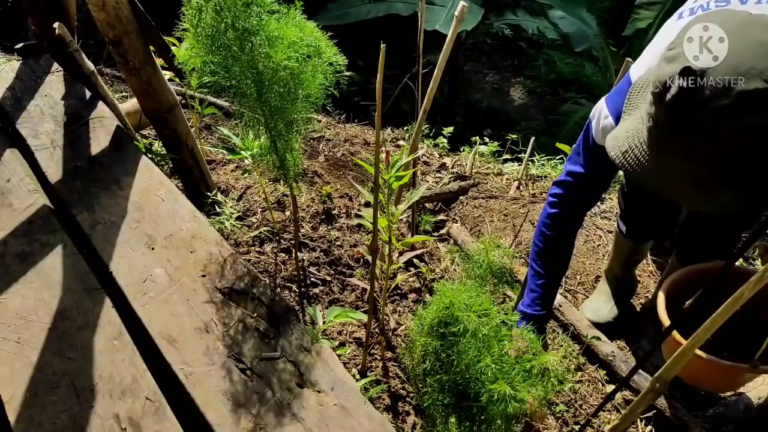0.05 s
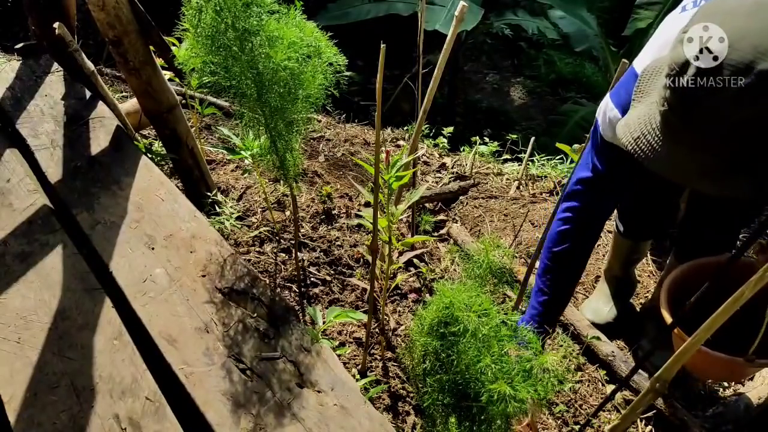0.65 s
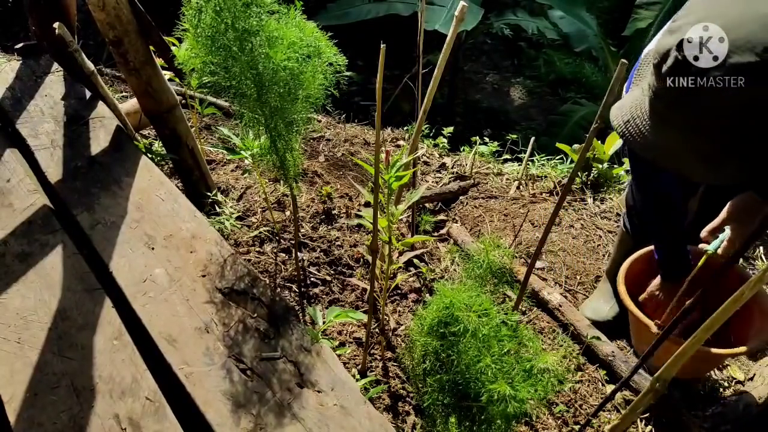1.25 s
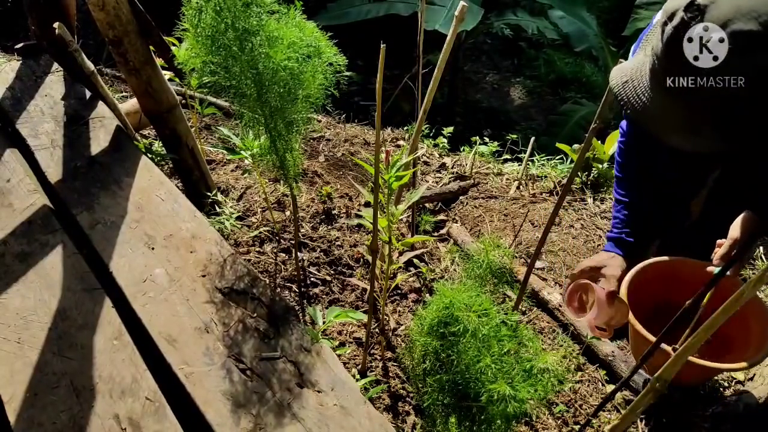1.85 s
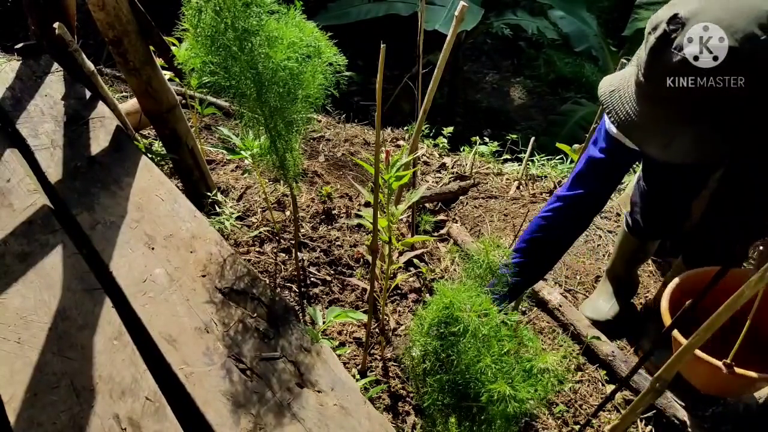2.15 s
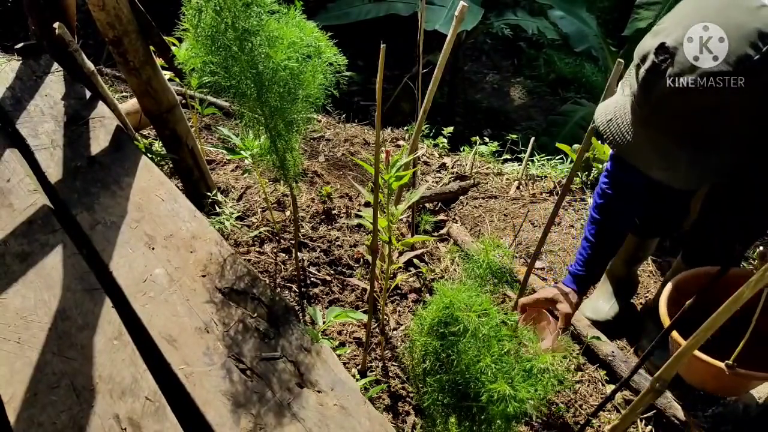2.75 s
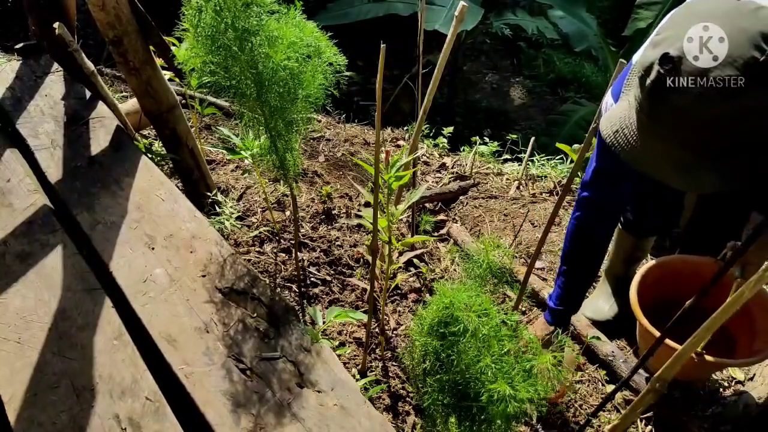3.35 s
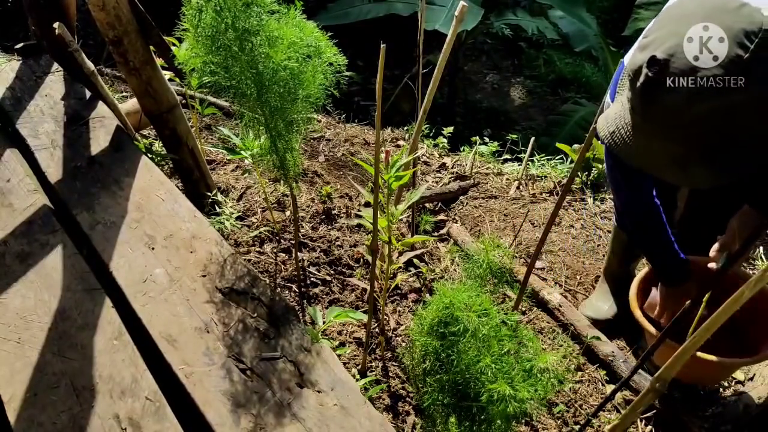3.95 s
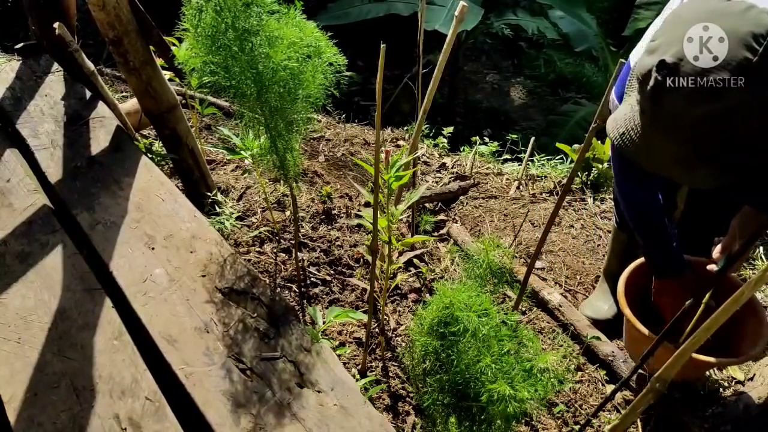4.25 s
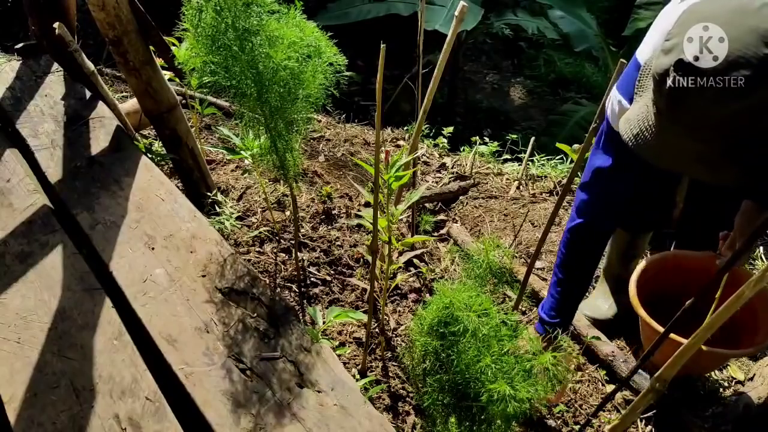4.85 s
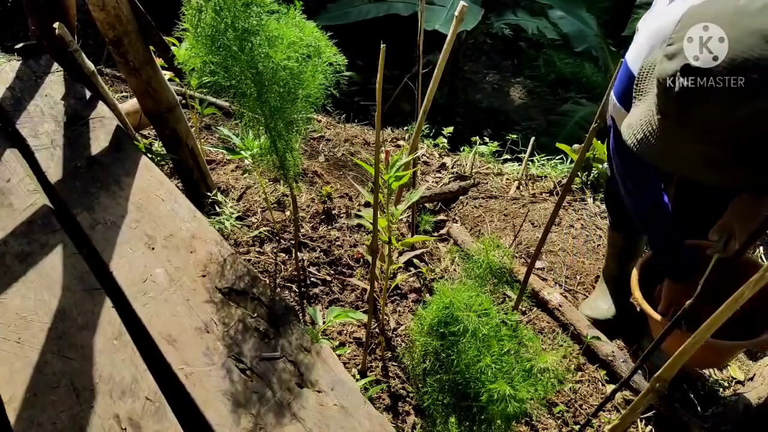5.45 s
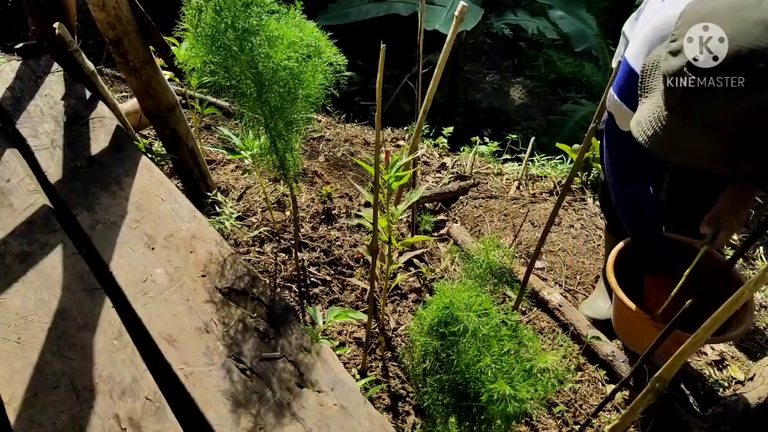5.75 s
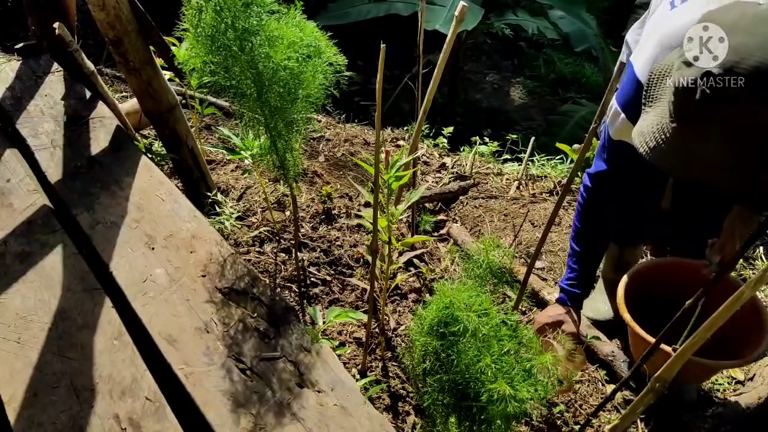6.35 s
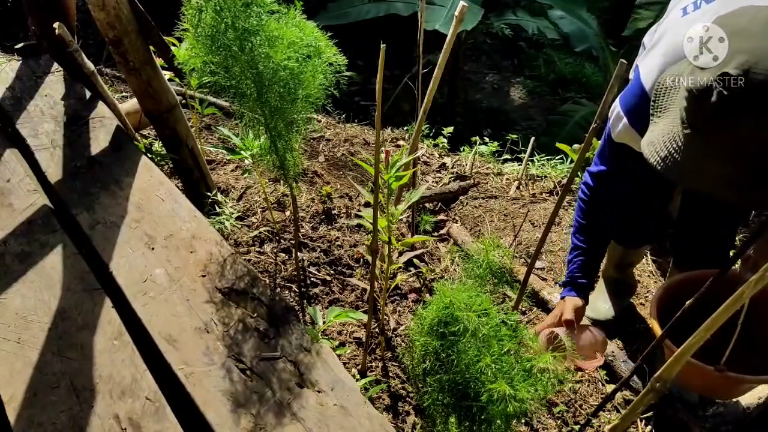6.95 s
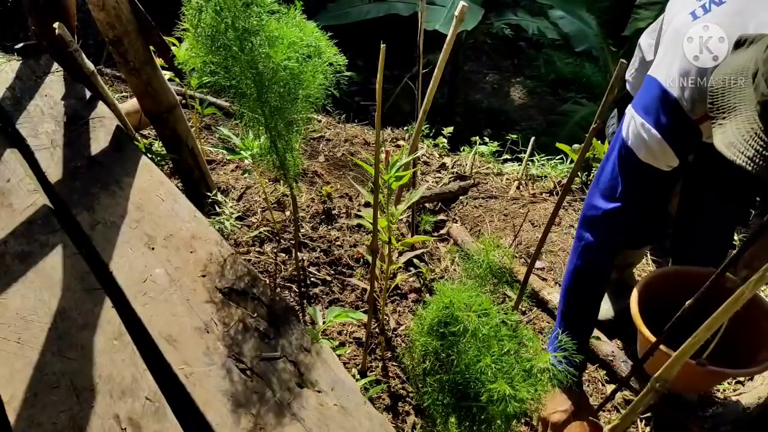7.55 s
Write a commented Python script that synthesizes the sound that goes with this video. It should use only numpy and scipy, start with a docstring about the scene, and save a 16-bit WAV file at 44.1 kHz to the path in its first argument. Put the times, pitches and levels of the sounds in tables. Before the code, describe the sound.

A high cicada drone fills a yard from the start, rises slightly in pitch near 3.7 seconds, then pulses and dies away by 5.5. A far rooster ends its crow within the first second, among thin, high bird chirps. At 1.3 seconds, a few steps from the stereo microphone, a cup slaps into water in a plastic bucket, with a hollow ring, splashing and gurgling plops until about 2. Water patters lightly on leaves and soil around 2.4. A second sharp dip comes at 4 seconds and a third at 5.6, followed by bubbles and drips until 6.1 and a soft low plop at 6.3. These splashes are the loudest sounds. A faint run of four falling bird whistles passes from 4.7 to 5.5, and more slurred chirps follow from 6.5 to 7.3. Underneath are a faint hiss, a steady rumble and soft thuds of the bucket and a footstep.

```python
"""Water from a plastic bucket, a few steps from a stereo microphone in a yard: a gardener waters seedlings.
Three times a cup dips in, slapping the water and ringing the bucket; trapped air gurgles and plops,
and water patters on leaves and soil. Cicadas drone near 5 kHz with their tymbals, rise a little in pitch
and die away. Songbirds whistle from the trees around and a far rooster ends its crow.
Underneath are a faint hiss, a steady rumble, and soft low thuds of the bucket and a footstep."""
import sys
import numpy as np
from scipy import signal
from scipy.fft import rfft, irfft, next_fast_len
from scipy.io import wavfile
from scipy.ndimage import uniform_filter1d

SR = 44100
rng = np.random.default_rng(int(sys.argv[2]) if len(sys.argv) > 2 else 0)


def master(y):
    """Save y as 16-bit WAV."""
    cut = np.clip(np.atleast_2d(y).T, -1, 1)
    pcm = np.round(cut * 32767)  # scale
    wavfile.write(sys.argv[1], SR, pcm.astype(np.int16))


N = 339129
T = np.arange(N) / SR

# Levels in the tables are those before any colouring and placement.
# background hiss of the yard, with a faint cicada band near 4.75 kHz: frequency_hz, level_db
YARD_HISS = [(15, -40.5), (25, -9), (95, 0.5), (191, -14), (655, -14), (1390, -19.5), (2630, -20.5),
             (4040, -27), (4750, -22), (5880, -25.5), (6540, -19), (7480, -25), (8550, -21.5),
             (10000, -30.5), (15000, -29.5)]
# soft low thuds of the bucket and a footstep: peak_s, level_db
LOW_THUDS = [(1.34, -62), (2.26, -62), (3.351, -71.5), (4.09, -63.5)]
# single insects at the start of the drone: pitch_hz, level_db
CICADA_TONES = [(4621, -5), (4660, -11), (4725, -7), (4745, -2), (4774, -3), (4825, -10), (4869, 0),
                (4915, -7), (4960, -13)]
# rasp of the tymbals around those tones: frequency_hz, level_db
TYMBAL_RASP = [(4300, -59.5), (4480, -24.5), (4620, 1), (4760, 0), (4900, 4), (5020, -18), (5200, -32),
               (5350, -36), (5520, -13.5), (5830, -13), (6100, -38.5), (6600, -59)]
# a small bird's high chirps: start_s, middle_hz, glide_octaves, level_db
HIGH_CHIRPS = [(0, 6050, -0.29, -63.5), (0.27, 6880, 0.039, -60.5), (0.594, 6180, -0.25, -55),
               (1.043, 6590, -0.14, -59), (1.832, 6430, -0.27, -54), (3.076, 6050, 0.042, -64),
               (3.576, 6280, 0.033, -69)]
# songbirds' slurs, and last a faint insect tone near 4.8 kHz: start_s, length_s, start_hz, end_hz, bend (under
# 1 glides early), level_db
SLURRED_NOTES = [(0.108, 0.025, 2510, 1830, 1.45, -63.5), (0.14, 0.066, 2450, 2070, 1.13, -63.5),
                 (0.544, 0.038, 4150, 3790, 1, -73), (0.569, .03, 3110, 3350, 1.2, -69.5),
                 (0.7, 0.047, 3060, 2900, 0.69, -71.5), (0.777, .04, 2790, 2690, 0.69, -71.5),
                 (0.915, 0.025, 1946, 1870, 1, -74.5), (2.275, 0.053, 2497, 2370, 1.8, -56),
                 (2.338, 0.071, 2300, 1826, 1.8, -65), (4.364, 0.017, 2463, 2233, 1.3, -60.5),
                 (6.532, 0.071, 2398, 3310, 2.34, -56.5), (6.647, 0.094, 3435, 3707, 0.32, -60.5),
                 (6.806, 0.016, 2602, 2417, 1.7, -51.5), (6.817, 0.049, 2366, 1670, 0.71, -63.5),
                 (6.879, 0.018, 1240, 910, 1, -68), (7.048, 0.074, 2244, 2650, 2.74, -61.5),
                 (7.092, 0.044, 6070, 5500, 0.88, -78), (7.224, .04, 3630, 3600, 1.4, -78.5),
                 (7.266, 0.043, 2950, 2534, 0.9, -69.5), (7.54, .1, 4760, 4880, 1.15, -78)]
# a plaintive run of whistles: final_hz, level_db
WHISTLE_RUN = [(2865, -64), (2814, -64), (2770, -63.5), (2780, -69.5)]
# end of the far rooster's crow: time_s, pitch_hz, level_db
CROW_CONTOUR = [(0, 696, -56.5), (.08, 723, -64.5), (.17, 696, -83), (.22, 696, -62), (.31, 695, -54.5),
                (.42, 690.5, -47.5), (.49, 664, -63.5), (.535, 661, -50), (.58, 640.5, -74),
                (.66, 656, -61), (.8, 623, -100)]
# drops landing on plastic and leaves: start_s, centre_hz, peak_db, width_octaves
DROP_SMACKS = [(0.161, 6370, -43.5, 0.25), (1.353, 12400, -39, 0.62), (1.351, 5280, -26, 0.21),
               (1.388, 6200, -27.5, 1.2), (1.412, 10500, -38, 0.83), (1.418, 14150, -29.5, .3),
               (1.4245, 5200, -23.5, 2.2), (1.425, 10250, -31.5, 0.25), (1.623, 6730, -45, 0.14),
               (2.386, 5540, -30.5, .4), (2.464, 2920, -33, 0.27), (2.573, 3020, -47, 0.22),
               (4.035, 5030, -24, 1.05), (4.07, 9800, -40, 0.53), (4.363, 6230, -35.5, 0.51),
               (5.659, 6630, -25.5, 0.86), (5.66, 9700, -29, 0.34), (5.737, 10500, -45, 0.6),
               (5.743, 5200, -47, 0.1), (5.792, 6630, -37, 0.63), (5.922, 7670, -40, 1.2),
               (6.105, 3380, -49, 0.31), (6.149, 5150, -44, 0.31)]
# the cup strikes water or bucket: start_s, air_pocket_hz, air_pocket_db, slap_db, slap_low_cut_hz
CUP_DIPS = [(1.291, 430, -23, -27.5, 210), (1.316, 416, -19, -25.5, 207), (3.946, 466, -19.5, -25.5, 222),
            (4.038, 402, -18, -22, 235), (4.067, 385.3, -20, -27, 238), (4.108, 428, -29.5, -29, 278),
            (5.543, 406, -26.5, -28.5, 433), (5.552, 421, -22, -42.5, 413), (5.577, 411, -29, -37.5, 422),
            (5.632, 385, -27.5, -28, 574), (6.303, 351, -40, -55.5, 126), (6.321, 251.5, -39, -77.5, 126)]
# spectrum of the cup's slap: frequency_hz, level_db
SLAP_SPECTRUM = [(70, 2.5), (220, 9.5), (500, -9), (850, -1), (1150, 3), (1600, -8), (3500, -16.5),
                 (7000, -33.5), (14000, -58.5)]
# resonances of the plastic bucket: pitch_hz, level_db
BUCKET_MODES = [(229, -7), (272, -3), (301, -3), (560, -4), (678, 0), (860, 1), (1073, -4), (1191, -4),
                (1256, -2), (1490, -3)]
# the biggest bubbles: start_s, pitch_hz, peak_db, swell_s
BIG_BUBBLES = [(1.316, 857, -21, 0.0025), (1.376, 1230, -29, .004), (1.412, 910, -28.5, 0.0029),
               (1.424, 1580, -17, 0.00075), (1.482, 610, -38.5, 0.0031), (1.519, 666, -40, 0.0024),
               (1.524, 466, -49, 0.0057), (1.555, 590, -42, 0.0039), (1.564, 874, -40, 0.0023),
               (1.567, 2030, -30.5, 0.0011), (1.574, 1610, -36, 0.0021), (1.628, 2150, -34.5, 0.0011),
               (1.665, 1514, -40, 0.0028), (1.697, 850, -36, 0.0037), (1.714, 977, -38.5, 0.0038),
               (1.7365, 788, -20.5, 0.0028), (1.76, 696, -38, 0.001), (1.86, 860, -29, 0.003),
               (1.88, 800, -45, 0.0046), (1.945, 865, -58.5, 0.0014), (1.985, 690, -63, 0.009),
               (2.04, 652, -64.5, 0.0073), (2.621, 1294, -52.5, 0.0046), (3.14, 1145, -64.5, 0.006),
               (4.505, 1148, -62, 0.0054), (3.9455, 976, -19.5, 0.0016), (3.946, 630, -25.5, 0.006),
               (3.977, 940, -29, 0.003), (4.009, 888, -32, 0.007), (4.035, 884, -19, 0.0029),
               (4.037, 3210, -25, 0.0011), (4.038, 2150, -26.5, 0.0019), (4.042, 284, -29, 0.004),
               (4.067, 960, -27.5, 0.0014), (4.108, 1060, -33.5, 0.002), (4.133, 740, -41.5, 0.0056),
               (5.575, 928, -30, 0.0014), (5.639, 1326, -31.5, 0.0027), (5.647, 932, -30, 0.0032),
               (5.731, 2050, -44.5, 0.0031), (5.744, 1580, -45, .002), (5.763, 1916, -46, .006),
               (5.796, 1930, -48, 0.0068), (5.829, 1525, -50, .004), (5.845, 1470, -45.5, 0.0026),
               (5.847, 2890, -48, 0.0026), (5.854, 2040, -40, 0.0014), (5.872, 1880, -43, 0.0026),
               (5.878, 3230, -50, 0.002), (5.933, 2840, -39.5, 0.00091), (5.982, 1590, -37, 0.0029),
               (5.982, 985, -36, 0.0025), (6.004, 1125, -30.5, 0.0024), (6.013, 958, -27, 0.0037),
               (6.043, 852, -33, 0.0038)]
# splashes: peak_s, rise_s, t60_s, gurgle_db, patter_db, patter_hz, spray_db, spatter_db
SPLASH_SURGES = [(1.383, 0.063, 0.34, -41, -45, 2120, -50, -64.5),
                 (1.39, 0.067, 0.072, -52.5, -55, 3600, -48, -46.5),
                 (1.437, .02, 0.21, -50, -56.5, 1740, -60, -71),
                 (1.569, 0.033, 0.14, -66, -48, 2120, -52.5, -78.5),
                 (1.63, .02, 0.8, -72.5, -66, 1910, -68, -84.5),
                 (1.745, 0.072, 0.19, -60.5, -51, 2365, -54.5, -72.5),
                 (2.395, 0.07, 0.18, -93, -58.5, 2880, -48.5, -61),
                 (2.445, .03, 0.16, -88, -58.5, 2970, -52.5, -68),
                 (2.679, 0.039, 0.2, -98, -87, 3030, -62, -79),
                 (3.984, 0.05, 0.23, -41, -59, 1500, -62.5, -79),
                 (4.014, 0.018, 0.21, -42, -36.5, 2990, -43.5, -52.5),
                 (4.037, 0.0094, .15, -37.5, -52, 3110, -45, -53),
                 (4.076, 0.029, 0.27, -45, -49.5, 2880, -47.5, -55.5),
                 (4.117, 0.022, 0.11, -48.5, -46, 2840, -52, -73),
                 (5.556, 0.017, 0.1, -56.5, -47.5, 2760, -53.5, -89.5),
                 (5.609, 0.022, 0.17, -44, -49.5, 3620, -51.5, -59),
                 (5.652, 0.06, 0.15, -41.5, -40.5, 1910, -51.5, -50.5),
                 (5.735, 0.023, 0.58, -62, -69, 2300, -67.5, -76),
                 (5.929, 0.023, 0.34, -74, -55, 2670, -56.5, -65),
                 (5.995, 0.022, 0.13, -81, -54.5, 2560, -47, -70)]
# tone of the water as heard at the microphone: frequency_hz, gain_db
WATER_COLOUR = [(40, -28), (130, 4), (230, -4), (400, 0), (1000, -2.5), (3300, 1), (5500, -6), (7100, 6.5),
                (8600, -8.5), (11000, -13), (15000, -13)]

MIC_LAG_SAMPLES = 9  # the bucket's sound reaches the right side this much later


def undb(db):
    """Decibels to gain."""
    return 10 ** (np.asarray(db) / 20)


def unit(x):
    """Scale to rms 1."""
    return x / np.sqrt(np.mean(np.abs(x) ** 2))


def fade(t, t60):
    """Exponential decay, 60 dB down after t60."""
    return np.exp(-np.log(1000) * t / t60)


def progress(length_s):
    """A ramp from 0 to 1."""
    return np.linspace(0, 1, int(length_s * SR))


def add(track, start_s, x):
    """Mix a sound into a track."""
    i = max(int(start_s * SR), 0)
    track[i:i + len(x)] += x[:N - i]


def colour(x, points):
    """Filter by a spectrum of (frequency_hz, gain_db) points."""
    hz, db = np.transpose(points)
    size = next_fast_len(x.shape[-1])
    bins_hz = np.maximum(np.fft.rfftfreq(size, 1 / SR), 1)
    gain = undb(np.interp(np.log(bins_hz), np.log(hz), db))
    return irfft(rfft(x, size) * gain, size)[..., :x.shape[-1]]


def band(x, hz, octaves):
    """Keep some octaves around a centre."""
    edge = 2 ** (octaves / 2)
    edges_hz = [hz / edge, min(hz * edge, .45 * SR)]
    return signal.sosfilt(signal.butter(2, edges_hz, "band", fs=SR, output="sos"), x)


def low_cut(x, hz, order):
    """Roll off the bass."""
    return signal.sosfilt(signal.butter(order, hz, "high", fs=SR, output="sos"), x)


def walk(rate_hz):
    """A smooth random wander of rms 1."""
    step = int(SR / rate_hz)
    knots = rng.standard_normal(N // step + 2)
    return unit(uniform_filter1d(np.interp(np.arange(N) / step, np.arange(len(knots)), knots), step))


def pan(left_over_right_db):
    """Gains for the two sides of the microphone."""
    return undb(left_over_right_db * np.array([[.5], [-.5]]))


def place(x, direct_db, wet_db, t60, lag=MIC_LAG_SAMPLES, shared_hz=800):
    """Direct sound and the yard's echoes, alike on both sides in the bass; the right side lags."""
    t = np.arange(SR) / SR
    mid, side = rng.standard_normal((2, SR)) * fade(t, t60) * np.clip(t / .00098 - 1, 0, 1)
    side = low_cut(side, shared_hz, order=2)
    echoes = np.array([mid + side, mid - side]) / np.sqrt(2 * np.sum(mid ** 2))
    wet = signal.fftconvolve(x[None], echoes, axes=1)[:, :N]
    left, right = undb(direct_db) * x + undb(wet_db) * wet
    return np.array([left, np.pad(right, (lag, 0))[:N]])


def yard_background():
    """A faint wide hiss, and soft low thuds of the bucket and a footstep over a steady rumble."""
    mid, side = colour(rng.standard_normal((2, N)), YARD_HISS)
    side = colour(side, [(30, -.5), (100, -3), (400, -2), (1200, .5)])
    hiss = unit(np.array([mid + side, mid - side]))
    noise = rng.standard_normal(N)
    rumble = unit(colour(noise, [(40, -19), (75, -8.5), (100, 6.5), (130, -8.5), (220, -25), (600, -52)]))
    hiss_level = undb(-69.5 + .5 * walk(2))
    thuds = sum(undb(db) * np.exp(-((T - peak_s) / .049) ** 2) for peak_s, db in LOW_THUDS)
    return hiss * hiss_level + rumble * (undb(-82) + thuds)


def cicadas():
    """Each insect holds a wavering tone in a band of rasp; the tones beat and rise as the chorus tires."""
    leader_hz, rise_hz, rise_at_s, silent_at_s = 4869, 118, 3.72, 5.575
    effort = np.maximum(1 - (T / silent_at_s) ** 2.06, 0)
    pitch_hz = leader_hz + rise_hz / (1 + np.exp((rise_at_s - T) / .33))
    rise_phase = 2 * np.pi * np.cumsum(pitch_hz - leader_hz) / SR
    leader = np.exp(1j * rise_phase)
    # the others rise less far and fade sooner
    followers = np.exp(.72j * rise_phase) * undb(np.interp(T, [4.35, 5], [0, -11]))
    tones = 0
    for hz, db in CICADA_TONES:
        phase = 2 * np.pi * np.cumsum(hz + 3.8 * walk(25)) / SR
        # swaying foliage gives each side of the microphone its own level and phase
        paths = np.array([undb(1.4 * walk(14)) * np.exp(.6j * walk(3.2)) * turn for turn in (1, 1j)])
        course = leader if hz == leader_hz else followers
        tones += undb(db) * course * paths * np.exp(1j * phase)
    rasp = signal.hilbert(colour(rng.standard_normal((2, N)), TYMBAL_RASP), next_fast_len(N))[:, :N]
    rasp_db = np.interp(T, [3.3, 4.3], [-5, -1.5])  # tired insects rasp more
    song = (unit(tones) + undb(rasp_db) * unit(rasp) * followers).real
    # the leader's octave flickers and fades as it tires
    octave = np.sin(4 * np.pi * np.cumsum(pitch_hz + 30 * walk(600)) / SR)
    octave *= undb(-37) * walk(150) * np.interp(T, [2.6, 3.2], [1, .2])
    flutter_db = np.interp(T, [4.2, 5], [1.1, 3]) * walk(60)
    # near its end the drone breaks into 14 pulses a second
    pulse_db = np.interp(T, [4.5, 4.9], [0, 3.5]) * (np.sin(2 * np.pi * 14 * T + walk(8)) - .5)
    onset = np.minimum(T / .003, 1)
    return (song + octave) * undb(-41.5 + flutter_db + pulse_db) * effort ** 1.34 * onset


def bird_notes():
    """Every chirp, slur, whistle and pip as start_s, pitch contour_hz, level_db."""
    for start_s, hz, glide, db in HIGH_CHIRPS:
        yield start_s, hz * 2 ** (glide * (progress(.037) - .5)), db
    for start_s, length_s, start_hz, end_hz, bend, db in SLURRED_NOTES:
        yield start_s, start_hz * (end_hz / start_hz) ** (progress(length_s) ** bend), db
    # each whistle slides down from a smaller height than the last
    slide_hz = 263 * (1 - progress(.225)) ** 2
    for k, (hz, db) in enumerate(WHISTLE_RUN):
        yield 4.69 + k * .208, hz + slide_hz * .71 ** k, db
    for k in range(3):  # soft, evenly spaced pips above the run
        yield 4.615 + k * .263, 3410 * 2 ** (.026 * (.5 - progress(.07))), -75


def birds():
    """Whistled glides with a quick tremor, reaching the microphone mostly by way of the trees."""
    out, tremor = np.zeros(N), walk(450)
    for start_s, hz, db in bird_notes():
        roughness = .007 + .08 * min(np.ptp(hz) / hz.mean(), .25)  # wide sweeps are harsh
        roughness += .04 * (hz.min() > 5200) * (np.ptp(hz) > 200)  # high chirps rasp
        roughness += .012 * np.interp(db, [-74, -64], [1, 0]) * (hz.max() < 4500)  # faint far notes blur
        waver = 1 + roughness * tremor[int(start_s * SR):][:len(hz)]
        phase = 2 * np.pi * np.cumsum(hz * waver) / SR
        arch = np.abs(np.sin(np.linspace(0, np.pi, len(hz)))) ** .5
        add(out, start_s, undb(db) * arch * np.sin(phase))
    return place(out, direct_db=-5, wet_db=3, t60=.33, lag=0, shared_hz=600) * undb(9) * pan(1)


def rooster():
    """From far off only the strongest partial of the crow is left, a little hoarse."""
    times_s, hz, db = np.transpose(CROW_CONTOUR)
    pitch_hz = np.interp(T, times_s, hz) * (1 + .013 * walk(130))
    level = undb(np.interp(T, times_s, db) + .7 * walk(60))
    crow = level * np.sin(2 * np.pi * np.cumsum(pitch_hz) / SR)
    return place(crow, direct_db=1.5, wet_db=-6, t60=.5, lag=MIC_LAG_SAMPLES // 2, shared_hz=900)


def drops():
    """Single drops land on plastic and leaves with a short smack."""
    out, t = np.zeros(N), np.arange(SR // 40) / SR
    for start_s, hz, db, octaves in DROP_SMACKS:
        smack = band(rng.standard_normal(len(t)) * fade(t, t60=.006) * t, hz, octaves)
        add(out, start_s, undb(db) * smack / np.abs(smack).max())
    return out


def air_pocket(hz, t60, glide, attack_s):
    """A pocket of air rings down, its pitch rising as it nears the surface."""
    t = np.arange(int(1.5 * t60 * SR)) / SR
    phase = 2 * np.pi * hz * (t + glide * t * t / (2 * t60))
    return np.sin(phase) * fade(t, t60) * (1 - np.exp(-t / attack_s))


def stray_drips(count=12, low_hz=700, high_hz=1302):
    """Faint drips off the cup and the plants plink at random moments."""
    out = np.zeros(N)
    for when, pitch, size in rng.random((count, 3)):
        plink = air_pocket(low_hz * (high_hz / low_hz) ** pitch, t60=.06, glide=.08, attack_s=.0034)
        add(out, when * N / SR, undb(-67.5 + 6 * size) * plink)
    return out


def cup():
    """Each dip slaps the water, traps a booming pocket of air and sets the bucket ringing."""
    out, t = np.zeros(N), np.arange(SR // 6) / SR
    modes = sum(undb(db) * np.sin(2 * np.pi * hz * t) for hz, db in BUCKET_MODES)
    bucket = undb(-11.5) * modes * fade(t, t60=.11)
    for start_s, pocket_hz, pocket_db, slap_db, low_cut_hz in CUP_DIPS:
        add(out, start_s, undb(pocket_db) * air_pocket(pocket_hz, t60=.045, glide=.02, attack_s=.003))
        slap = unit(colour(rng.standard_normal(len(t)), SLAP_SPECTRUM))
        slap *= fade(t, t60=.059) * (1 - np.exp(-t / .00095))
        # each slap and bucket ring has its own bass cut
        add(out, start_s, undb(slap_db) * low_cut(slap + bucket, low_cut_hz, order=5))
    return out


def plops(pitch_rise=.0061):
    """As the cup fills, lifts and drips, big bubbles swell and ring down, rising a little in pitch."""
    out = np.zeros(N)
    for start_s, hz, db, swell_s in BIG_BUBBLES:
        t = np.arange(int(8 * swell_s * SR)) / SR
        age = t / swell_s
        phase = 2 * np.pi * hz * t * (1 + pitch_rise * (age / 2 - 1))
        add(out, start_s, undb(db) * np.sin(phase) * (age * np.exp(1 - age)) ** 2)
    return out


def tiny_bubbles(low_hz, high_hz, per_s, ring_cycles, spread_db, pitches=14):
    """A stream of tiny bubbles of random timing and size, each swelling softly before it rings down."""
    out = np.zeros(N)
    for hz in np.geomspace(low_hz, high_hz, pitches):
        births = np.zeros(N)
        when, size = rng.random((int(per_s * N / SR / pitches), 2)).T
        births[(when * N).astype(int)] = undb(spread_db * np.minimum(-np.log(size), 4))
        pole = np.exp((2j * np.pi - np.log(1000) / ring_cycles) * hz / SR)
        out += unit(signal.lfilter([1], np.poly([pole, pole]), births).imag)
    return unit(out)


def surge(peak_s, rise_s, t60):
    """A splash builds to its height, then dies away."""
    return fade(np.maximum(T - peak_s, 0), t60) * np.clip(1 + (T - peak_s) / rise_s, 0, 1)


def splashes():
    """Stirred and poured water: larger bubbles gurgle, small ones patter, spray hisses, all in spurts."""
    spray = tiny_bubbles(4600, 7700, per_s=1400, ring_cycles=18, spread_db=4.6, pitches=20)
    patter = tiny_bubbles(1100, 4600, per_s=1000, ring_cycles=20, spread_db=3.5, pitches=24)
    gurgle = tiny_bubbles(520, 1400, per_s=900, ring_cycles=10, spread_db=1)
    spurts = unit(undb(2.5 * walk(90)))
    pattering, gurgle_power, spray_power = np.zeros((3, N))
    for peak_s, rise_s, t60, gurgle_db, patter_db, patter_hz, spray_db, _ in SPLASH_SURGES:
        swell = surge(peak_s, rise_s, t60)
        own_patter = unit(band(np.roll(patter, rng.integers(N)), patter_hz, octaves=1))
        pattering += undb(patter_db) * swell * own_patter
        gurgle_power += (undb(gurgle_db) * swell) ** 2
        spray_power += (undb(spray_db) * swell) ** 2
    return spurts * (pattering + np.sqrt(gurgle_power) * gurgle + np.sqrt(spray_power) * spray)


def spatter():
    """The finest droplets make a dense, bright fizz on top of each splash."""
    power = sum((undb(db) * surge(peak_s, rise_s, t60)) ** 2
                for peak_s, rise_s, t60, *_, db in SPLASH_SURGES)
    mist = tiny_bubbles(8200, 15000, per_s=2200, ring_cycles=20, spread_db=4.8)
    return np.sqrt(power) * colour(mist, [(8500, -3), (10000, -5), (12300, -7), (13500, -19)])


def scene():
    """The bucket stands a few steps off, a little left, among walls and plants; animals are all around."""
    inside = place(colour(cup() + splashes(), WATER_COLOUR), direct_db=1.5, wet_db=-1, t60=.27)
    # plops and smacks at the surface reach the microphone more directly
    surface = colour(plops() + drops() + stray_drips(), WATER_COLOUR)
    surface = place(surface, direct_db=2, wet_db=-2.5, t60=.26)
    fizz = place(spatter(), direct_db=-5, wet_db=-3, t60=.13)
    water = (inside + surface) * pan(1.2) + fizz * pan(1.5)
    return water + cicadas() * pan(1) + birds() + rooster() + yard_background()


def record(dry):
    """The microphone cuts off steeply above 15.5 kHz."""
    return signal.sosfilt(signal.ellip(10, .2, 70, 15500, fs=SR, output="sos"), dry)


dry = scene()
out = record(dry)
master(out)
```